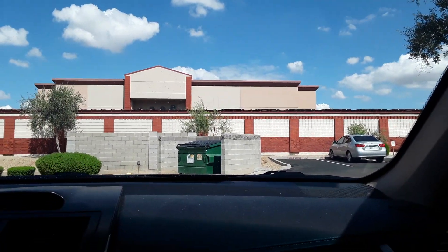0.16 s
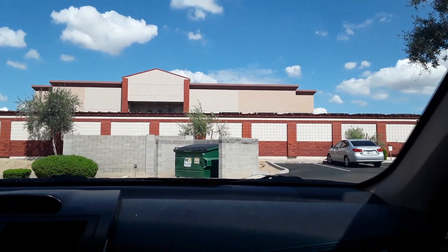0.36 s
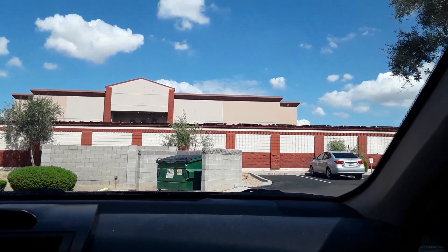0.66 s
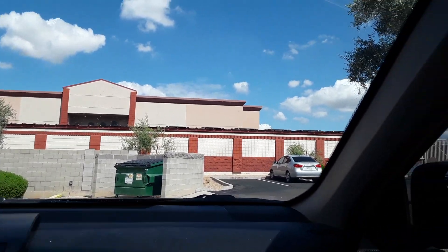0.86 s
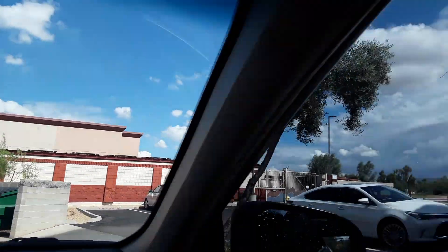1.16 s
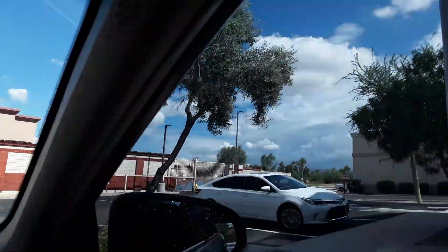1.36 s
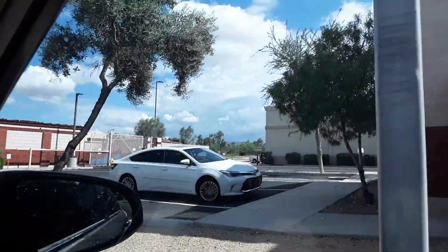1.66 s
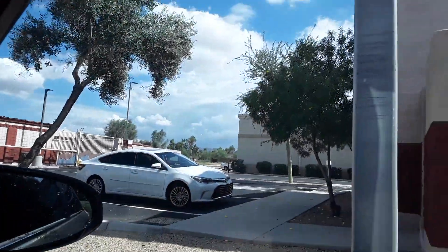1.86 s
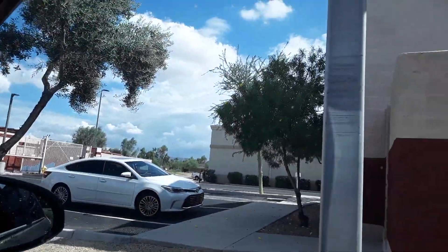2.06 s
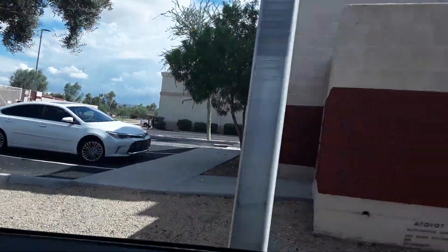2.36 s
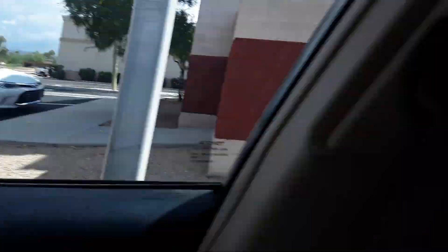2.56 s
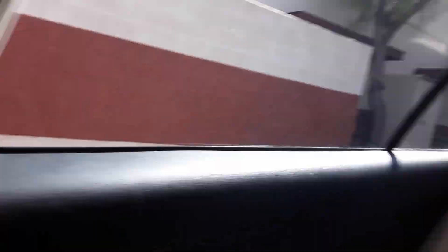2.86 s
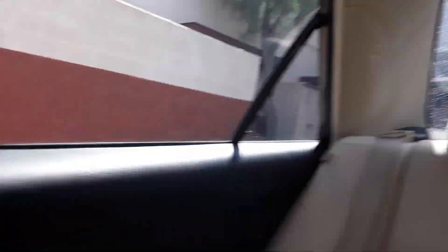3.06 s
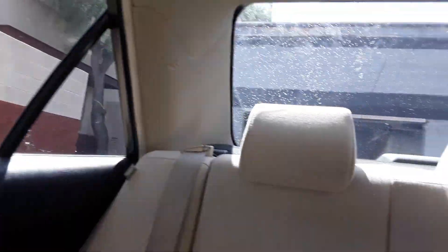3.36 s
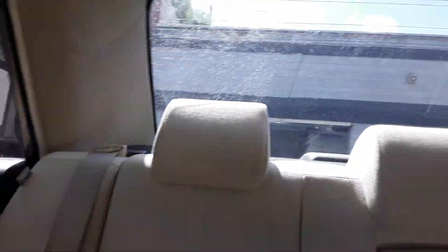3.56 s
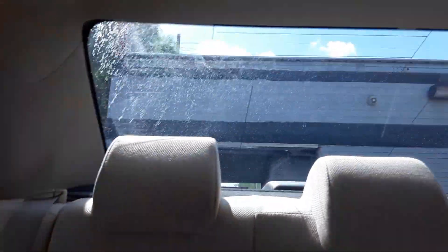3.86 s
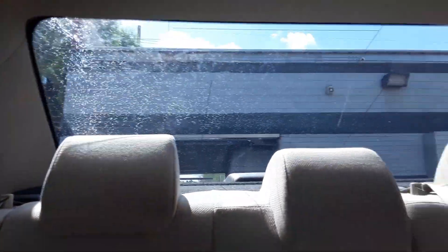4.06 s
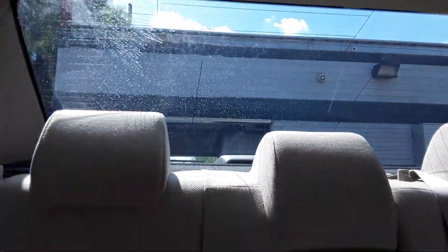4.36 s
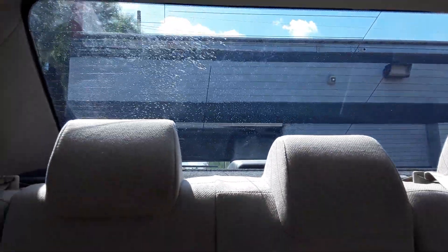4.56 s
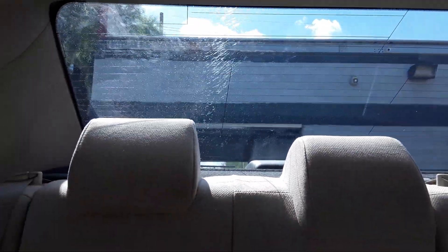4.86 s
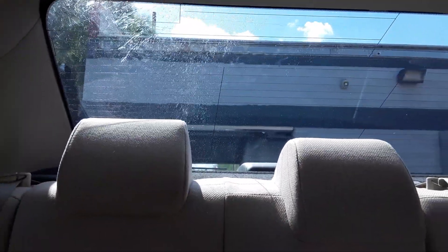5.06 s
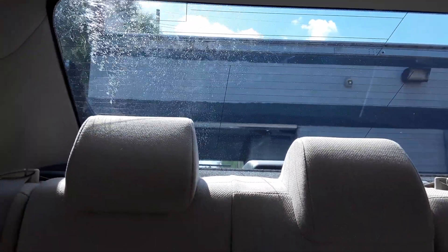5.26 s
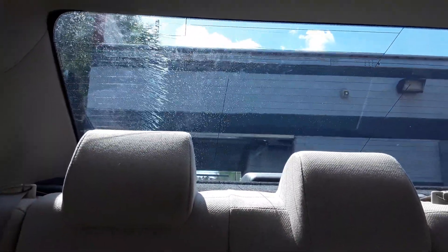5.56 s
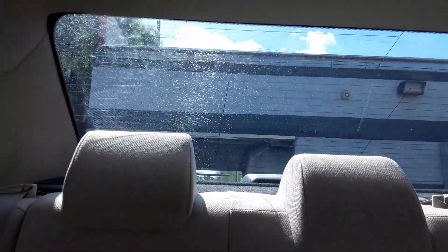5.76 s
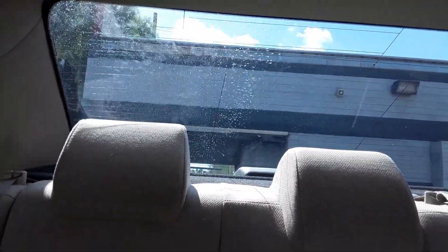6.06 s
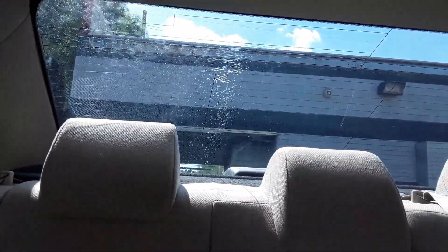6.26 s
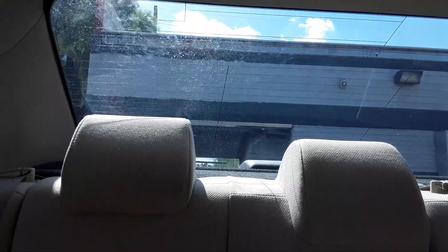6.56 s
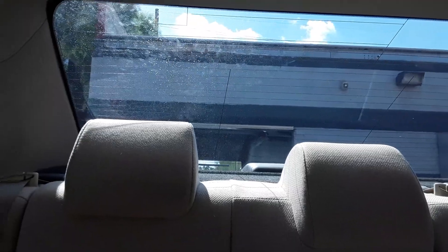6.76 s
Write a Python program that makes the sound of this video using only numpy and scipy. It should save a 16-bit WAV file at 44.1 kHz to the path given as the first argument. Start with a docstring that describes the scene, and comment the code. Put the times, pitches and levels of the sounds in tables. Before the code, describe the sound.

Inside a car, loud blowers rush and rumble in gusts while drops spatter the body and fine mist sizzles on the glass.

```python
"""Inside a car rolling out under the dryers of a car wash. First, air jets drum on the roof, so the
panels roar and the cabin booms, while a burst of drops spatters the body. Near 2.7 s the listener
turns to the rear window: air hisses and whistles at the seals, and fine spray sizzles on the glass.
Then the blowers drone, jets sweep down the rear window, and two last slaps of water hit the roof."""
import sys
import numpy as np
from scipy import signal
from scipy.fft import rfft, irfft, next_fast_len
from scipy.io import wavfile
from scipy.ndimage import uniform_filter1d, map_coordinates

SR = 44100
rng = np.random.default_rng(int(sys.argv[2]) if len(sys.argv) > 2 else 0)


def to_wav(s):
    """Save 16-bit WAV."""
    ch = np.atleast_2d(s).T  # columns
    pcm = np.round(np.clip(ch, -1, 1) * 32767)  # PCM
    wavfile.write(sys.argv[1], SR, pcm.astype(np.int16))


N = 304731

# Tone colours, or how strong each sound is from low to high: f/Hz, relative level/dB
BLOWER_TONE = [(250, -27), (500, 0.5), (730, 4), (930, 0), (1060, 1.5), (1260, -1), (1650, -5), (2300, -9),
               (3000, -11.5), (4200, -20.5), (8000, -55)]
DOOR_TONE = [(1200, -24), (1800, -2.5), (2250, -4), (2650, -8), (3300, -25.5)]
SEAL_TONE = [(1500, -5.5), (3150, -10), (3550, 0.5), (4150, 1.6), (4650, 0.5), (5200, -6), (5900, -13.5),
             (7200, -7.5), (7700, -29), (15000, -47)]
GLASS_TONE = [(2000, -7), (3500, -1), (4700, 0), (5350, 1), (5900, -4.5), (6500, -7.5), (7300, -13),
              (7800, -35)]
FIZZ_TONE = [(2000, -15), (5300, 2), (7300, 0.5), (7800, 0), (8800, 1.5), (10100, -1.5), (12400, 4),
             (13700, 1), (14700, -2.5), (16000, -10)]  # water on glass
SIZZLE_TONE = [(600, -15), (1400, 10), (3000, -12), (5500, -13), (7100, -1.5), (8000, -12), (10300, -14),
               (11800, 4), (13000, 4), (14200, -3.5), (16000, -7)]  # drops on the body
SPLAT_TONE = [(800, -8), (1800, -1), (4500, 1), (7200, 3), (9500, 0), (15000, -9)]
RUMBLE_TONE = [(15, -52), (28, -42), (42, -19), (62, -4), (84, 7.5), (100, -1.5), (140, -30), (300, -74)]
BOOM_TONE = [(30, -37), (70, -11), (105, -0.5), (175, -3), (230, -1), (400, -18), (1000, -70)]
PANEL_TONE = [(90, -22), (170, 0), (215, -1.5), (260, -0.5), (330, -3), (460, -7), (560, -11.5), (720, -17),
              (920, -25), (1300, -36), (2500, -52), (6000, -90)]
GUST_BRIGHTENING = [(220, -2), (420, 1.5), (660, 0.5), (1000, 0)]  # added to the panels' tone

# Resonances, the pitches at which something rings: f/Hz, width/Hz, relative level/dB
HOUSING_RINGS = [(419, 33, 10.5), (567, 80, 4), (715, 42, 4), (822, 35, 0.5), (1296, 80, -4),
                 (1494, 110, -8.5)]  # the hollow blower housings
GAP_RINGS = [(6780, 390, -3), (7060, 180, -1.5), (7380, 220, -7)]  # a gap in a seal
NARROW_GAP_RINGS = [(5260, 63, -1), (7050, 80, 1), (9455, 65, -5)]
ROOF_RINGS = [(1120, 280, 5.5), (1680, 370, 3.5), (2080, 660, -4.5)]
CABIN_RINGS = [(117.6, 24, -5), (140.3, 20.4, -1.5), (165, 29, -5.5)]  # the air inside the car

# How alike the cabin sounds on the left and right: f/Hz, likeness (1 = the same)
STEREO_LIKENESS = [(50, 0.89), (140, 1), (225, .82), (400, 0.89), (590, 0.45), (720, 0.64), (900, -0.11),
                   (1030, 0.039), (1270, -0.49), (1700, -0.29), (2300, 0.17), (3000, -0.072), (4000, 0.016),
                   (15000, -0.052)]
# Which side is louder: f/Hz, left minus right level/dB
STEREO_BALANCE = [(60, 0.5), (130, 0.5), (290, -1), (490, 0.2), (900, 0.5), (2000, -0.1), (2700, -1.5),
                  (3900, 4), (5100, -0.5), (6000, 4), (6900, 9.5), (8200, -2), (10000, 3), (14000, 3)]
# Strength of the airflow over the car: t/s, relative level/dB
AIRFLOW = [(0.0, -42), (0.72, -43.5), (0.98, -46), (1.7, -46), (2.45, -47), (2.7, -44), (3.35, -42.5),
           (4.77, -41.5), (6.24, -43.5), (6.91, -43)]

# Swells, sounds that rise and fade: peak t/s, level/dB, half-length/s
HOUSING_SWELLS = [(2.75, -33, 0.13), (4.2, -38, 0.89), (6.2, -31.5, 0.69)]  # the car passes the blower housings
DOOR_SWELLS = [(3.2, -47.5, 1.26)]  # a jet runs along the doors
SIDE_SEAL_SWELLS = [(2.88, -47.5, 0.14)]  # the listener turns past the side window's seal
GLASS_SWELLS = [(4.35, -44.5, 0.54), (5.95, -45, 0.26)]  # a jet sweeps down the rear window
GAP_SWELLS = [(3.55, -51.5, 1.05)]  # the gap passes a nozzle
NARROW_GAP_SWELLS = [(4.4, -52, 0.6)]  # narrower gaps do the same
BODY_HEAVES = [(1.22, -29, .09), (2.2, -37, 0.25), (3.95, -28.5, .3), (5.05, -26, .17)]  # gusts make the body heave

# The gap catches the air and sings out: peak t/s, level/dB, half-length/s, f/Hz, width/Hz, fall/Hz
GAP_FLARES = [(2.76, -58, 0.035, 7050, 350, 0), (2.99, -53, 0.035, 6630, 260, 170.5),
              (3.056, -51, .085, 6900, 800, 0.5), (3.268, -50, 0.029, 7060, 400, 0),
              (3.46, -51, 0.049, 7060, 750, 0.5), (3.56, -48, 0.02, 7050, 550, 249.5)]
# Single large drops on the glass: t/s, relative level/dB
GLASS_TICKS = [(.409, -33), (.537, -34), (.6155, -28), (.723, -35), (.8045, -39), (.899, -39), (2.904, -28)]
# Handfuls of drops on the body: peak t/s, sizzle level/dB, splat level/dB, half-length/s
BODY_SPLASHES = [(0.421, -46, -50, .008), (.453, -42, -46, .0065), (.516, -46.5, -56, .005),
                 (.536, -49, -59, .004), (.571, -50, -62, .005), (.58, -52, -61, 0.12),
                 (0.617, -42, -49, 0.0085), (0.72, -48, -52, .006), (1.155, -54, -62, .025),
                 (2.65, -59, -58, .07), (3.295, -48, -56, 0.0096), (4.27, -51, -51, .016)]
# Heavier slaps of water on the roof: t/s, relative level/dB
ROOF_SLAPS = [(.122, -35.5), (.305, -38), (.386, -39), (.407, -32), (.447, -37.5), (.472, -36), (.716, -36),
              (6.08, -36), (6.225, -37)]
# A jet catches the body: peak t/s, boom level/dB, roar level/dB, half-length/s
JET_GUSTS = [(0.004, -17.5, -20, 0.17), (0.432, -17, -19, 0.083), (0.672, -14, -15, 0.06),
             (0.998, -15.5, -19.5, 0.11), (1.11, -15.5, -19, .012), (1.182, -15, -16.5, 0.074),
             (1.429, -15, -14, 0.039), (1.557, -19.5, -41, 0.036), (2.126, -16, -27, 0.035),
             (2.704, -42, -26, 0.093), (3.467, -18, -22, 0.12), (3.85, -41, -23, 0.35),
             (4.135, -18.5, -22.5, 0.047)]

TURN_AT_S, TURN_S = 2.69, 0.37  # middle and length of the listener's turn
ECHO_DB, LATEST_ECHO_S = -13, .016
SPRAY_PEAK_S, SPRAY_RISE_S, SPRAY_FALL_S = 3.3, 0.36, 1.28
SPRAY_DB, DRIZZLE_DB = -47, -56.5  # mist at its thickest; before and after
FLARE_WANDER_HZ, FLARE_LEAN_DB = 49.7, 14  # unsteadiness of the pitch; left minus right
BOOM_FRONT_DB, BOOM_REAR_DB = -1, 2  # added left minus right, facing front and rear
PEAK_CEILING, TOP_HZ = .97, 15760


def amp(db):
    """Turn decibels into a gain to multiply by."""
    return 10 ** (np.asarray(db) / 20)


def unit(x):
    """Scale a stereo pair so that the average of its two sides has rms level 1."""
    return x / np.sqrt(np.mean(x.mean(axis=0) ** 2) + 1e-20)


def along(points, hz):
    """Read between (f/Hz, value) points on a log frequency axis."""
    f, v = np.transpose(points)
    return np.interp(np.log(hz + 1), np.log(f + 1), v)


def wobble(rate):
    """A smooth random curve through `rate` random values a second."""
    return map_coordinates(rng.standard_normal(int(N * rate / SR) + 4), [np.arange(N) * rate / SR])


def swells(rows):
    """The gain of overlapping bell-shaped swells; their powers add."""
    t = np.arange(N) / SR
    return np.sqrt(sum(amp(db) ** 2 * np.exp(-.5 * ((t - s) / half) ** 2) for s, db, half in rows))


def filtered(x, response):
    """Multiply each frequency in x by response(hz)."""
    size = next_fast_len(N + SR // 2)
    return irfft(rfft(x, size) * response(np.fft.rfftfreq(size, 1 / SR)), size)[..., :N]


def coloured(x, tone):
    """Give x a tone colour made of (f/Hz, level/dB) points."""
    return filtered(x, lambda hz: amp(along(tone, hz)))


def resonate(x, rings):
    """Make x ring at each of the listed resonances."""
    return filtered(x, lambda f: sum(
        (-1) ** k * amp(db) * 1j * f * width / (hz * hz - f * f + 1j * f * width)
        for k, (hz, width, db) in enumerate(rings)))


def in_cabin(pair):
    """Blend two unrelated signals: long waves reach both ears alike, short ones do not."""
    def blend(hz):
        angle = np.arccos(np.clip(along(STEREO_LIKENESS, hz), -.99, .99)) / 2
        return np.array([np.cos(angle), np.sin(angle)])
    mid, side = filtered(pair, blend)
    left_right = np.array([mid + side, mid - side])
    return filtered(left_right, lambda hz: amp(np.outer([.5, -.5], along(STEREO_BALANCE, hz))))


def turbulence(patchy_db):
    """Stereo noise whose swirls make short patches of frequency louder or softer."""
    spectrum = signal.stft(rng.standard_normal((2, N)), nperseg=512)[2]
    patches = uniform_filter1d(rng.standard_normal(spectrum.shape[1:]), size=4, axis=0)
    patches = uniform_filter1d(patches, size=14, axis=1)
    spectrum *= amp(patchy_db * patches / patches.std())
    return in_cabin(signal.istft(spectrum, nperseg=512)[1][:, :N])


def droplets(rate, spread_db):
    """Tiny impacts of mixed size, `rate` a second in each channel."""
    hits = (rng.random((2, N)) < rate / SR) * rng.standard_normal((2, N))
    sizes = amp(spread_db * np.clip(rng.standard_normal(N), -2, 2))
    return in_cabin(hits * sizes)


def flow_db():
    """How far the airflow is above or below its average strength."""
    strength_db = np.interp(np.arange(N) / SR, *np.transpose(AIRFLOW))
    return strength_db - strength_db.mean()


def facing_rear():
    """0 while the listener faces forward, 1 after turning to the rear window."""
    return np.clip((np.arange(N) / SR - TURN_AT_S) / TURN_S + .5, 0, 1)


def window_echoes(x, count=10):
    """The windows bounce back weak, quick copies of the treble."""
    delays = (rng.uniform(.001, LATEST_ECHO_S, (count, 2)) * SR).astype(int)
    treble = coloured(x, [(1200, -32), (3000, 0)])
    copies = [sum(np.pad(side, (d, 0))[:N] for d in lags) for side, lags in zip(treble, delays.T)]
    return amp(ECHO_DB) * np.array(copies) / np.sqrt(count)


def blower_air():
    """The blowers rush and drone; their air hisses along the doors, the seals and the rear window."""
    flow, rear = flow_db(), facing_rear()
    rush_gain = amp(-37 + flow + 0.53 * rear + 0.11 * wobble(10))
    hiss_gain = np.hypot(amp(-46.2 + 0.68 * flow + rear + 0.27 * wobble(12)), swells(SIDE_SEAL_SWELLS))
    drone_gain = np.hypot(amp(-47), swells(HOUSING_SWELLS))
    sweep_gain = np.hypot(amp(-51) * rear, swells(GLASS_SWELLS))
    rush = rush_gain * unit(coloured(turbulence(patchy_db=1), BLOWER_TONE))
    housings = resonate(turbulence(patchy_db=1.5), HOUSING_RINGS)
    drone = drone_gain * unit(coloured(housings, [(1400, 0), (2400, -16)]))
    doors = swells(DOOR_SWELLS) * unit(coloured(turbulence(patchy_db=1.5), DOOR_TONE))
    hiss = hiss_gain * unit(coloured(turbulence(patchy_db=1), SEAL_TONE))
    sweep = sweep_gain * amp(0.27 * wobble(8.9)) * unit(coloured(turbulence(patchy_db=1.5), GLASS_TONE))
    return rush + drone + doors + hiss + sweep


def whistles():
    """Air sings in gaps as they pass a nozzle: first a hoarse whistle, then a few thin tones."""
    air = coloured(turbulence(patchy_db=3.5), [(5500, -20), (6500, -4), (7450, 5), (7750, -25)])
    gap_gain = np.hypot(amp(-73), swells(GAP_SWELLS))
    hoarse = gap_gain * amp(.35 * wobble(5.7)) * unit(resonate(air, GAP_RINGS))
    thin = swells(NARROW_GAP_SWELLS) * unit(resonate(turbulence(patchy_db=5), NARROW_GAP_RINGS))
    return hoarse + thin


def whistle_flares():
    """The gap sings out in short hoarse bursts; some fall in pitch as they go."""
    out = np.zeros((2, N))
    for s, db, half, hz, width_hz, fall_hz in GAP_FLARES:
        pitch = hz - fall_hz / 2 * np.tanh((np.arange(N) / SR - s) / half)
        flutter = filtered(rng.standard_normal((2, N)), lambda f: np.exp(-(2 * f / width_hz) ** 2))
        wander = FLARE_WANDER_HZ * np.array([wobble(300), wobble(300)])
        tone = np.cos(2 * np.pi * np.cumsum(pitch + wander, axis=1) / SR)
        out += swells([(s, db, half)]) * unit(flutter * tone)
    return out * amp(np.array([[.5], [-.5]]) * FLARE_LEAN_DB)


def spray():
    """A cloud of mist with a few larger drops arrives fast, sizzles on the glass and slowly thins."""
    t = np.arange(N) / SR - SPRAY_PEAK_S
    cloud = np.exp(-.5 * (t / np.where(t < 0, SPRAY_RISE_S, SPRAY_FALL_S)) ** 2)
    wetness = np.hypot(amp(DRIZZLE_DB), amp(SPRAY_DB) * np.sqrt(cloud))
    fizz = unit(coloured(turbulence(patchy_db=.7), FIZZ_TONE))
    flutter_db = (1.05 - .35 * cloud) * wobble(55)  # thin mist flutters more
    mist = amp(flutter_db + 0.5 * wobble(8)) * fizz
    patter = amp(-8.5 + 1.7 * wobble(29.7)) * unit(coloured(droplets(rate=390, spread_db=0), FIZZ_TONE))
    return wetness * (mist + cloud * patter)


def spatter():
    """Handfuls of fine drops sizzle on the body; the heavier ones also land with a splat."""
    sizzle = unit(amp(1.1 * wobble(120)) * coloured(droplets(rate=9000, spread_db=4), SIZZLE_TONE))
    splat = unit(amp(1.5 * wobble(250)) * coloured(droplets(rate=12000, spread_db=3), SPLAT_TONE))
    sizzle_gain = swells([(s, db, half) for s, db, _, half in BODY_SPLASHES])
    splat_gain = swells([(s, db, half) for s, _, db, half in BODY_SPLASHES])
    return (sizzle_gain * sizzle + splat_gain * splat) * amp([[-1], [1.5]])  # nudged to the right


def ticks(decay_s=.0009):
    """Single large drops strike the glass with a sharp tick that dies at once."""
    out, t = np.zeros((2, N)), np.arange(SR // 20) / SR
    for s, db in GLASS_TICKS:
        start = round(s * SR)
        out[:, start:start + len(t)] += amp(db) * np.exp(-t / decay_s) * rng.standard_normal((2, len(t)))
    return coloured(out, FIZZ_TONE) / 2


def slaps(rise_s=0.0017, decay_s=0.025):
    """Each slap of water spreads quickly and scatters into drops that tap the roof."""
    starts, levels_db = np.transpose(ROOF_SLAPS)
    age = np.maximum(np.arange(N) / SR - starts[:, None], 0)
    shapes = (1 - np.exp(-age / rise_s)) * np.exp(-age / decay_s)
    taps = unit(resonate(droplets(rate=3300, spread_db=5.5), ROOF_RINGS))
    return (amp(levels_db) @ shapes) * taps


def drumming_jets():
    """Jets beat on the body, steadily and in gusts: the cabin booms, panels roar, the rear rumbles."""
    flow, buffet, rear = flow_db(), wobble(15), facing_rear()
    boom_swells = swells([(s, db, half) for s, db, _, half in JET_GUSTS])
    boom_gain = np.hypot(amp(-22 + 0.064 * flow), boom_swells) * amp(0.44 * buffet)
    boom_pan = amp(np.outer([.5, -.5], BOOM_FRONT_DB + rear * (BOOM_REAR_DB - BOOM_FRONT_DB)))
    gust_gain = swells([(s, db, half) for s, _, db, half in JET_GUSTS])
    rumble_gain = np.hypot(amp(-34.5 + 7.5 * rear ** 2), swells(BODY_HEAVES))
    cabin_air = resonate(turbulence(patchy_db=0), CABIN_RINGS)
    boom = boom_gain * boom_pan * unit(coloured(cabin_air, BOOM_TONE))
    roar = amp(-23 + 0.76 * flow + 0.14 * buffet) * unit(coloured(turbulence(patchy_db=1.1), PANEL_TONE))
    gusts = gust_gain * unit(coloured(coloured(turbulence(patchy_db=0.5), PANEL_TONE), GUST_BRIGHTENING))
    rumble = rumble_gain * amp(1.7 * wobble(3.95)) * unit(coloured(turbulence(patchy_db=1), RUMBLE_TONE))
    return boom + roar + gusts + rumble


def scene():
    """Air and water as heard in the cabin, with echoes from the windows."""
    air = drumming_jets() + blower_air() + whistles() + whistle_flares()
    water = spray() + spatter() + ticks() + slaps()
    return air + water + window_echoes(air + water)


def record(dry):
    """Round off the highest peaks and cut everything above TOP_HZ."""
    rounded = dry / (1 + np.abs(dry / PEAK_CEILING) ** 10) ** (1 / 10)
    return filtered(rounded, lambda hz: hz < TOP_HZ)


dry = scene()
out = record(dry)
to_wav(out)
```